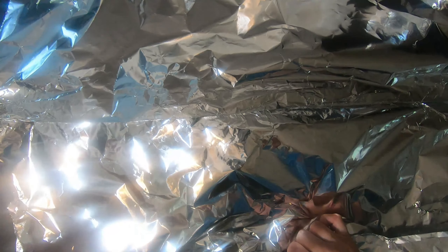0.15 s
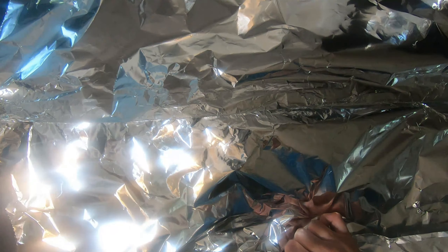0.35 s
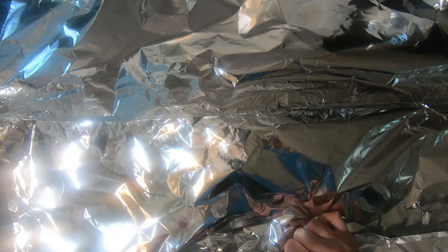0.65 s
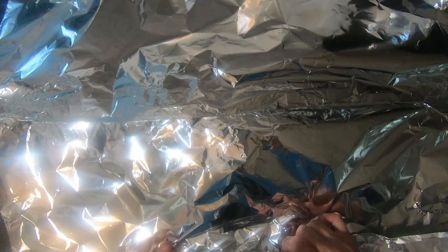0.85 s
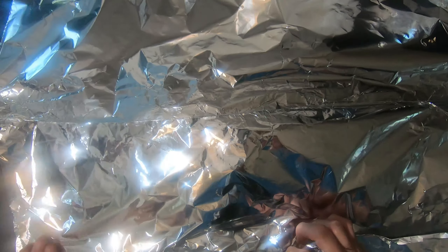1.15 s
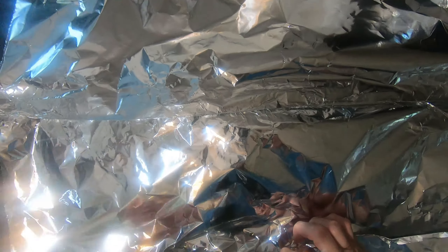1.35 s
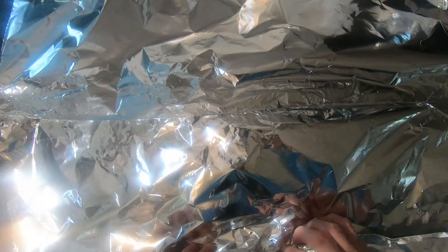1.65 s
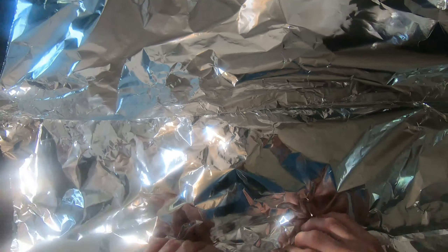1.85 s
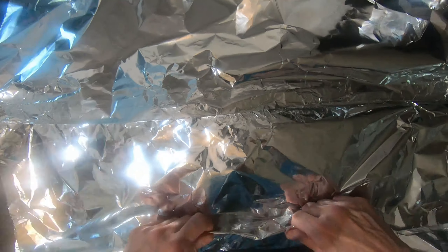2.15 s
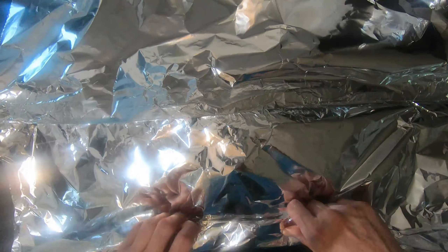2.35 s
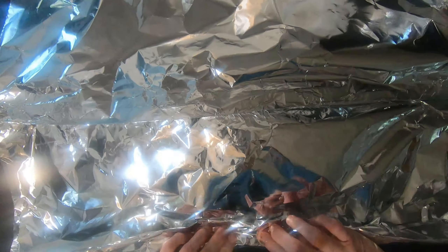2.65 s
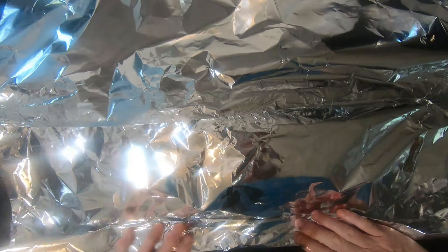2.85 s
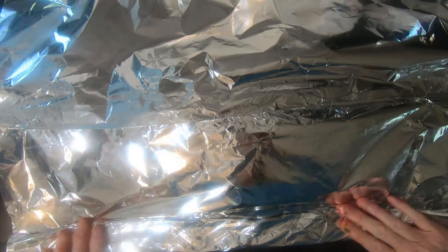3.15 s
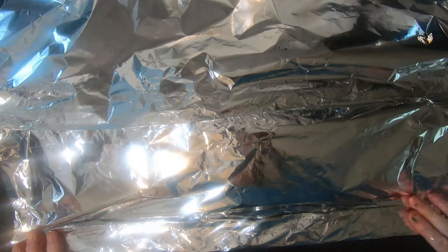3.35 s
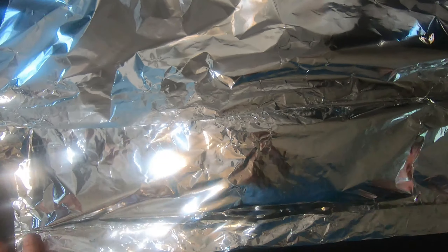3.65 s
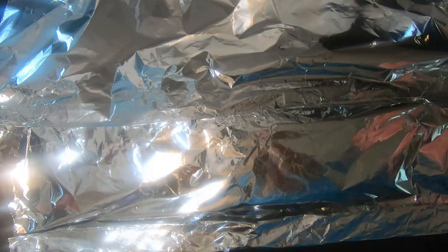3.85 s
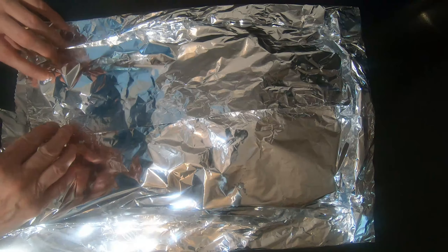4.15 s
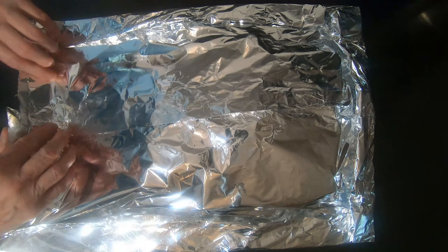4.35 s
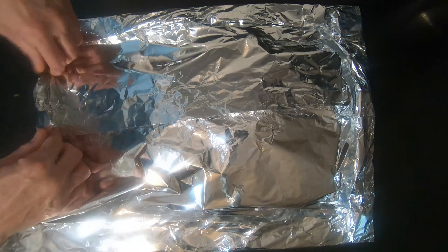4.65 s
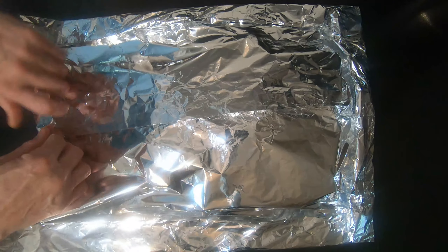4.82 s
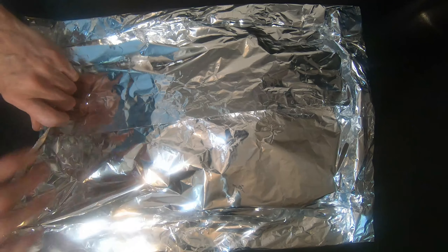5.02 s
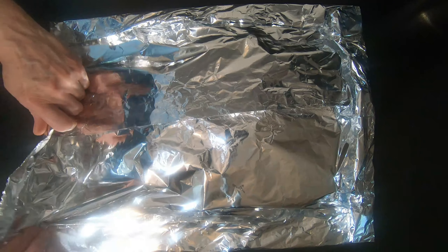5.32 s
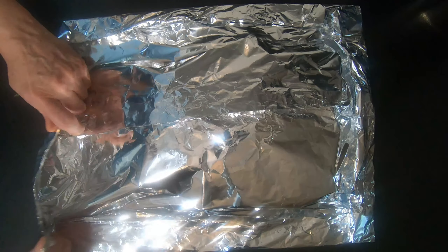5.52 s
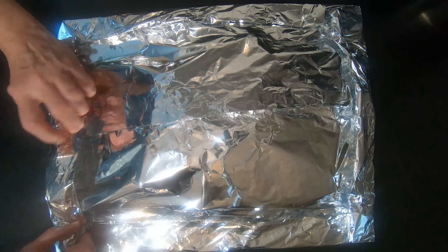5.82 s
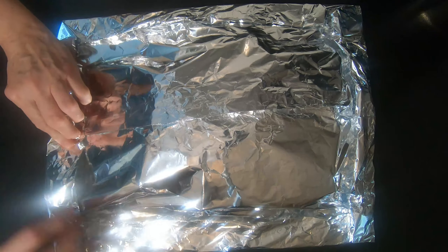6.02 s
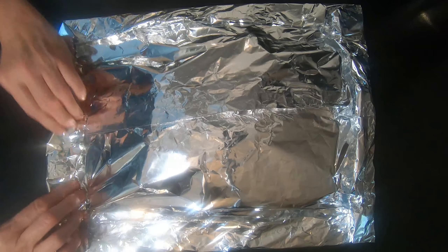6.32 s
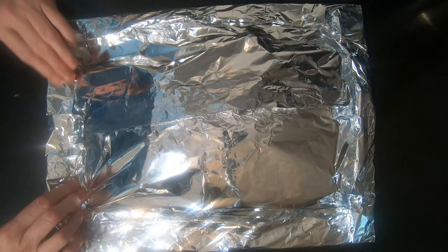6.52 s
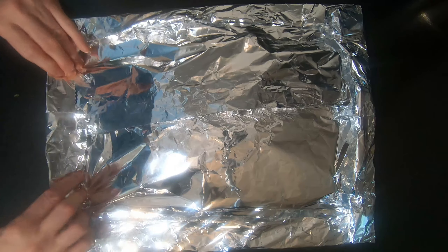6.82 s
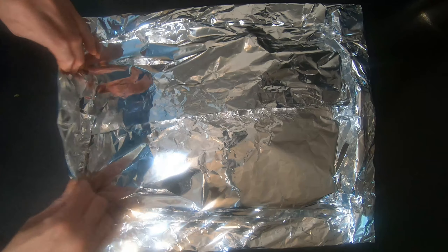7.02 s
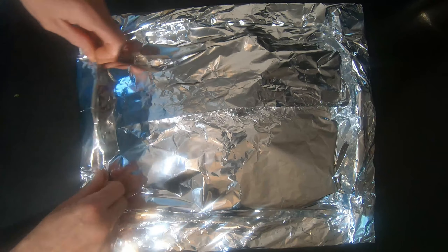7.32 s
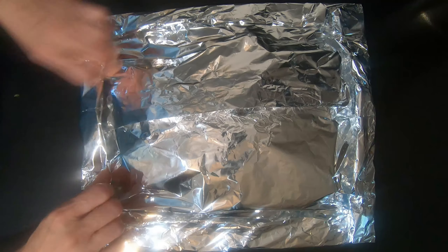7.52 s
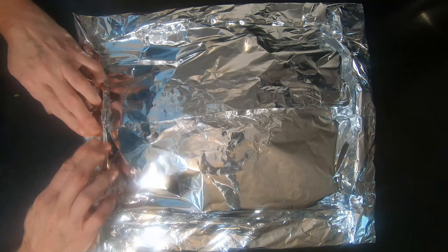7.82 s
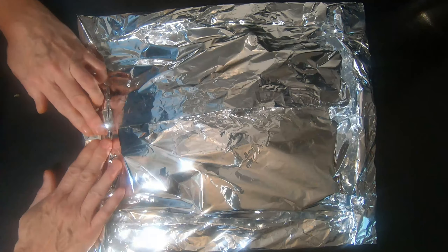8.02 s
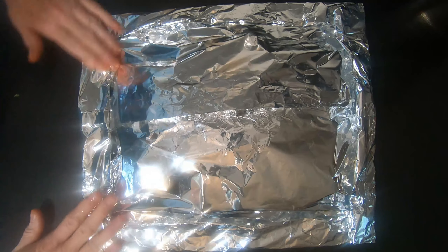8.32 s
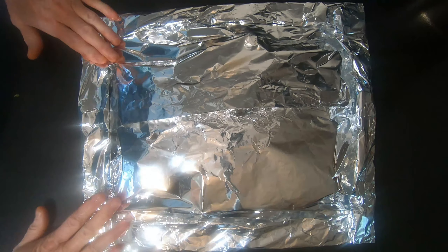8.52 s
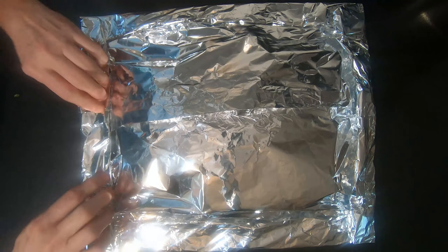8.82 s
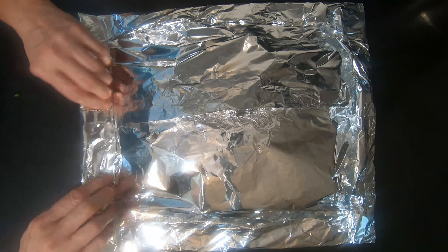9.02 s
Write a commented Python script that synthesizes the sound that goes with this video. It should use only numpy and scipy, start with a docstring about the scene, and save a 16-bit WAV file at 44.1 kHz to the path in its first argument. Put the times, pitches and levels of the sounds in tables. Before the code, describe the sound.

Aluminium foil crinkles and crackles brightly in close hand-made bursts, with sharp snaps, small pops and soft tray bumps over a faint kitchen hum.

```python
"""Two hands fold and crimp aluminium foil round a tray of food, first along its side, then at its end.
From the start an appliance hums in the small kitchen and the working fingers shake the tray.
Creases buckle in avalanches of tiny clicks, each a burst of noise that rings briefly in the sheet.
Big creases soon snap in clusters of such bursts, and hands bump the tray: noise rings its low modes.
Then wide facets pop, and later the taut cover pings: dying tones, each started by a dull crack."""
import sys
import numpy as np
from scipy import signal
from scipy.fft import rfft, irfft, next_fast_len
from scipy.io import wavfile
from scipy.ndimage import uniform_filter1d

SR = 44100
rng = np.random.default_rng(int(sys.argv[2]) if len(sys.argv) > 2 else 0)


def wav_out(sig):
    """Save sig, one row per channel (or a flat mono array), as 16-bit PCM at SR to the path in sys.argv[1]."""
    wavfile.write(sys.argv[1], SR, np.round(np.clip(np.atleast_2d(sig).T, -1, 1) * 32767).astype(np.int16))


N = 404397
TIME = np.arange(N) / SR
RING_SIZE = 8192  # samples in one crease, pop or bump
RING_TIME = np.arange(RING_SIZE) / SR
RING_HZ = np.fft.rfftfreq(RING_SIZE, 1 / SR) + 1  # the 1 keeps the logarithm finite

# Big creases giving way. Each row: time in seconds, peak level in dB before a trim shared by all.
BIG_CREASES = [(0.112, -14.5), (0.185, -16), (0.431, -13), (0.54, -17.5), (0.737, -35.5), (0.758, -37),
               (1.305, -20), (1.563, -14), (1.897, -12), (1.964, -15), (2.548, -18), (2.662, -18.5),
               (2.795, -10), (3.227, -14.5), (3.942, -19.5), (4.04, -17), (4.206, -25), (4.327, -21),
               (4.523, -19), (4.65, -12), (4.831, -13.5), (4.959, -18), (5.164, -17.5), (5.204, -23.5),
               (5.253, -23.5), (5.298, -22), (5.6, -17), (5.64, -14), (5.8, -15.5), (6.259, -15.5),
               (6.764, -22), (7.049, -17.5), (7.197, -13.5), (7.647, -15.5), (7.717, -22), (8.123, -13),
               (8.173, -19), (8.398, -17), (8.429, -14), (8.525, -16.5), (8.566, -13.5), (8.671, -16),
               (8.692, -11.5), (8.885, -22.5), (8.941, -14), (8.972, -19), (9.022, -16)]


def from_db(db):
    """Turn decibels into a gain."""
    return 10 ** (np.asarray(db) / 20)


def rms_one(x):
    """Scale a sound to an average (rms) strength of 1."""
    return x / np.sqrt(np.mean(x ** 2) + 1e-20)


def in_time(rows):
    """Draw each column of a table as a curve over time, with straight lines between rows."""
    seconds, *columns = np.transpose(rows)
    return [np.interp(TIME, seconds, column) for column in columns]


def at_hz(points, hz):
    """Read a curve of (Hz, dB) points on a log-frequency axis."""
    point_hz, point_db = np.transpose(points)
    return np.interp(np.log(hz), np.log(point_hz), point_db)


def drift(per_s):
    """A random wander of rms 1, with this many fresh values per second."""
    values = rng.standard_normal(N // 20)
    return rms_one(np.interp(TIME * per_s, np.arange(N // 20), values))


def add(out, seconds, sound):
    """Mix a sound into the output at a given time."""
    at = max(round(seconds * SR), 0)
    out[..., at:at + sound.shape[-1]] += sound[..., :N - at]


def kitchen(rumble_db=-50, side_db=-9.0, waver_rad=1.0):
    """Room rumble is noise coloured by a curve; an appliance hums as steady tones of wandering phase."""
    # Colour of the rumble. Each row: pitch in Hz, relative level in dB per Hz.
    rumble_colour = [(25, -24), (62, -9), (95, -15), (150, 1.5), (290, -11), (500, -6), (900, -20),
                     (5000, -18), (14000, -44)]
    # Hum of the appliance. Each row: pitch in Hz, rms level in dB before the final balance.
    hum_tones = [(76, -63.5), (151.5, -60.5)]
    size = next_fast_len(N + RING_SIZE, True)
    hz_axis = np.fft.rfftfreq(size, 1 / SR) + 1
    noise = rfft(rng.standard_normal((2, size)))
    mid, side = irfft(noise * from_db(at_hz(rumble_colour, hz_axis)))[:, :N]
    out = from_db(rumble_db) * rms_one(mid + from_db(side_db) * side * [[1], [-1]])
    for hz, db in hum_tones:
        phase = 2 * np.pi * hz * TIME + waver_rad * drift(8.3)
        out = out + from_db(db) * np.sqrt(2) * np.sin(phase)
    return out


def crushing(attack_s=0.023, release_db_per_s=201.5, fold_s=.019):
    """Crushing strength in dB: foil yields fast, holds, then settles; collapsing folds add flurries."""
    # Presses of the fingers. Each row: start in seconds, length in seconds,
    # relative crackle level in dB at the start, and the same at the end.
    presses = [(-0.02, 0.348, -29, -25), (0.343, 0.24, -32, -28), (0.775, 0.16, -23, -24.5),
               (0.951, 0.29, -25, -25.5), (1.281, 0.26, -28, -35), (1.555, 0.71, -29, -23),
               (2.284, 0.26, -26.5, -26), (2.57, 0.11, -33.5, -26), (2.665, 0.38, -23, -22),
               (3.045, .43, -24.5, -24), (3.488, 0.36, -29.5, -31), (3.94, .16, -26, -30.5),
               (4.112, 0.34, -34.5, -37), (4.321, 0.54, -29.5, -28.5), (4.923, 0.14, -32, -28),
               (5.1, 0.22, -38, -34.5), (5.302, .27, -25.5, -24.5), (5.603, 0.54, -28, -28.5),
               (6.16, .08, -39, -32), (6.254, 0.17, -27.5, -29.5), (6.42, 0.27, -37, -30),
               (6.731, 0.425, -29.5, -28), (7.155, 0.32, -26.5, -24.5), (7.478, 0.2, -27, -32),
               (7.708, .09, -32, -23.5), (7.807, .24, -27, -24.5), (8.076, 0.18, -30.5, -34.5),
               (8.198, .245, -27.5, -23), (8.458, 0.26, -31, -37.5), (8.676, 0.15, -28, -35.5),
               (8.879, 0.05, -28, -32), (8.936, 0.21, -28.5, -25.5)]
    # Folds collapsing. Each row: time of the peak in seconds, relative crackle level in dB.
    folds = [(0.437, -26), (0.915, -23), (2.47, -24), (3.245, -23), (3.673, -27.5), (3.979, -27.5),
             (4.405, -27), (5.039, -29.5), (5.534, -25), (5.859, -24.5), (6.276, -25), (6.348, -24.5),
             (6.972, -26), (7.449, -25.5), (7.805, -24.5), (7.978, -23)]
    power = np.zeros(N)
    for start, length, start_db, end_db in presses:
        held_db = np.interp(TIME, [start, start + length], [start_db, end_db])
        settled_db = np.clip(release_db_per_s * (TIME - start - length), 0, 100)
        rise = np.clip((TIME - start) / attack_s, 0, 1)
        power += (rise * from_db(held_db - settled_db)) ** 2
    for peak_s, db in folds:
        near = np.abs(TIME - peak_s) < 10 * fold_s
        power[near] += from_db(db) ** 2 * np.exp(-((TIME[near] - peak_s) / fold_s) ** 2)
    return 10 * np.log10(power + 1e-7)


def sticking(stick_db=2.5, stick_s=.016):
    """Foil holds still just before a big crease gives way: how far the crackle dips, in dB."""
    dip_db = np.zeros(N)
    for s, _ in BIG_CREASES:
        near = np.abs(TIME - s) < 10 * stick_s
        # the dip is deepest half of stick_s ahead of the snap
        dip_db[near] += stick_db * np.exp(-((TIME[near] - s) / stick_s + .5) ** 2)
    return dip_db


def avalanches(per_s=60, fade_s=0.0025, surge=0.76):
    """One crease tips its neighbours: the strength of the clicks leaps up and dies away."""
    starts = (rng.random(N) < per_s / SR) * rng.exponential(1, N)
    surges = signal.lfilter([1], [1, -np.exp(-1 / (fade_s * SR))], starts + 1e-18)
    return np.sqrt(1 + surge * surges)


def sheet_colour(s, span_width_hz=950):
    """The sheet's spectrum at a moment: moving and fixed resonances, with the deep bass taken away."""
    # What a click sounds like in the sheet. Each row: pitch in Hz, relative level in dB per Hz.
    sheet_curve = [(250, -18), (370, -22.5), (480, -13), (900, -7.5), (1500, -4.5), (3000, -2), (5000, -3),
                   (7700, -6.5), (10300, -13.5), (11500, -22), (14000, -30), (15700, -43)]
    # Fixed resonances shared by every click. Each row: pitch in Hz, width in Hz, gain in dB.
    fixed_peaks = [(453, 83, 4.5), (1065, 17, 3.5), (1640, 100, 4)]
    # Main resonance of the free span of foil, which shifts with the grip.
    # Each row: time in seconds, pitch in Hz, gain in dB.
    free_span = [(.85, 2550, 2), (1.35, 3120, 3.5), (2.3, 2570, 2.5), (4.2, 3180, 3), (5.4, 3450, 3),
                 (6.6, 3240, 3), (7.4, 3100, 2), (8.3, 3020, 4)]
    times, pitches, gains_db = np.transpose(free_span)
    span = (np.interp(s, times, pitches), span_width_hz, np.interp(s, times, gains_db))
    colour_db = at_hz(sheet_curve, RING_HZ)
    for hz, width, gain_db in [*fixed_peaks, span]:
        colour_db = colour_db + gain_db / (1 + (2 * (RING_HZ - hz) / width) ** 2)
    return from_db(colour_db) / np.sqrt(1 + (170 / RING_HZ) ** 6)


def buckle(s, uneven_db, crack_db, crack_t60=0.0037, sheet_t60=0.062, room_t60=0.3, room_db=-9, pan_db=1.0):
    """One crease in stereo, energy 1: a crack, bending waves dying in the sheet, then the room."""
    # Spread of the sound between the ears. Each row: pitch in Hz, side minus mid in dB.
    ear_spread = [(300, -25), (700, -5.5), (1400, -5), (2600, -9.5), (5000, -8), (8000, 0)]
    # The sheet radiates unevenly to the two sides. Each row: pitch in Hz, left minus right in dB.
    sheet_lean = [(350, -5.5), (700, -4), (1300, 3), (2800, 0.4), (5000, -2)]
    # each stage: strength in dB, seconds to fade by 60 dB
    stages = [(crack_db, crack_t60), (0, sheet_t60), (room_db, room_t60)]
    fade = np.sqrt(sum(from_db(db - 60 * RING_TIME / t60) ** 2 / t60 for db, t60 in stages))
    mid, side = rfft(rng.standard_normal((2, RING_SIZE)) * fade)
    # every facet has broad resonances of its own
    own_log_hz = np.linspace(np.log(300), np.log(SR / 2), 24)
    own_db = uneven_db * np.interp(np.log(RING_HZ), own_log_hz, rng.standard_normal(24))
    # minimum phase: nothing rings before the crack
    cepstrum = irfft(np.log(sheet_colour(s) * from_db(own_db) + 1e-4))
    keep = (RING_TIME > 0) * (RING_TIME < RING_TIME[-1] / 2)
    colour = np.exp(rfft(2 * cepstrum * keep))
    ears = mid + side * from_db(at_hz(ear_spread, RING_HZ)) * [[1], [-1]]
    lean_db = at_hz(sheet_lean, RING_HZ) + pan_db * rng.normal()
    sound = irfft(ears * colour * from_db(lean_db * np.array([[.5], [-.5]])))
    return sound / np.sqrt(np.sum(sound.mean(0) ** 2))


def ticks(crush_db, per_s=30, over_db=11.5, spread_db=8.0, low_hz=2000, high_hz=8500):
    """Now and then a tiny crease facing the microphone gives a dry, sharp tick, uneven between the ears."""
    level_db = crush_db + over_db + rng.uniform(-spread_db, spread_db, (2, N))
    clicks = (rng.random(N) < per_s / SR) * from_db(level_db)
    band = signal.butter(2, [low_hz, high_hz], "band", fs=SR, output="sos")
    return signal.sosfilt(band, clicks + 1e-18)


def crackle(per_s=1000, rate_per_db=0.0842, size_db=2.5, level_db=0.3, even_s=0.041, facets_per_s=24, count=6):
    """Creases buckle all over the sheet; harder crushing makes them both louder and more frequent."""
    crush_db = crushing() - sticking()
    rate = per_s * np.exp(2 * rate_per_db * (crush_db - np.median(crush_db)))
    sizes = from_db(size_db * np.minimum(rng.exponential(1, N), 4.5)) * avalanches()
    clicks = (rng.random(N) < rate / SR) * sizes * rng.choice([-1, 1], N)
    # the fingers feed in energy steadily, and the creases share it out
    power = uniform_filter1d(clicks ** 2, int(even_s * SR))
    power = uniform_filter1d(power, int(even_s * SR / 2))
    clicks = clicks / np.sqrt(np.abs(power) + 1e-3) * from_db(crush_db + level_db)
    # a few facets are in play at once; fresh ones take over from old ones, one by one
    facet = (TIME * facets_per_s + count * rng.random(N)).astype(int)
    out = np.zeros((2, N))
    for k in range(facet.max()):
        first, last = np.searchsorted(TIME, [(k - count) / facets_per_s, (k + 1) / facets_per_s])
        own = clicks[first:last] * (facet[first:last] == k)
        ring = buckle(first / SR, uneven_db=2.5, crack_db=-10.0)
        add(out, first / SR, signal.fftconvolve(own[None], ring, axes=1))
    return out + ticks(crush_db)


def facet_size(x, wide_db=8.0, tiny_db=5.5, wide_hz=1700, tiny_hz=5500):
    """Loose wide facets darken the crackle, tight little ones brighten it."""
    # Size of the facets being worked. Each row: time in seconds, wide against middling ones in dB,
    # tiny against middling ones in dB; wide_db and tiny_db are added to these.
    facet_mix = [(.15, -6.5, -6), (.85, -11.5, -8.5), (1.15, -13, -2.5), (1.9, -8.5, -3.5), (2.5, -9, -8),
                 (3.7, -14, -5.5), (4, -11, -6), (4.22, -13.5, -8), (4.55, -5, -2.5), (5.4, -9, -6.5),
                 (5.9, -5, -6.5), (6.55, -11, -5), (7.35, -7, -6.5), (8.3, -8.5, -7), (8.65, -9.5, -6),
                 (9.05, -9.5, -7.5)]
    wide, tiny = in_time(facet_mix)
    low = signal.sosfiltfilt(signal.butter(2, wide_hz, fs=SR, output="sos"), x)
    high = signal.sosfiltfilt(signal.butter(2, tiny_hz, "high", fs=SR, output="sos"), x)
    middle = x - low - high
    return middle + low * from_db(wide + wide_db) + high * from_db(tiny + tiny_db)


def tray(bump_db=-2.5, push_s=0.02, shake_db=-50.0, follows=0.36, uneven_db=2.0):
    """Soft pushes and the steady work of the fingers shake the tray's low modes."""
    # Dull modes of the tray on the counter. Each row: pitch in Hz, relative gain in dB,
    # ring length in seconds (the fade by 60 dB takes about a fifth longer).
    tray_modes = [(71.6, -7.5, 0.18), (126, -1.5, 0.36), (150.2, -0.5, 0.088), (197.5, -5, 0.28)]
    # Hands bumping the tray. Each row: time in seconds, peak level in dB before bump_db is added.
    bumps = [(0.19, -30), (0.829, -35), (1.191, -35), (2.247, -32), (3.36, -33), (4.51, -33), (6.76, -38),
             (6.93, -30.5), (7.391, -32), (7.975, -32), (8.402, -33.5)]

    def body(force):
        """Ring every mode with the same force."""
        return sum(from_db(db) * signal.lfilter(*signal.iirpeak(hz, hz * ring_s / 1.83, fs=SR), force)
                   for hz, db, ring_s in tray_modes)

    crush_db = crushing()
    level_db = shake_db + follows * (crush_db - np.median(crush_db)) + uneven_db * drift(12)
    out = rms_one(body(rng.standard_normal(N))) * from_db(level_db)
    for s, peak_db in bumps:
        push = rng.standard_normal(RING_SIZE) * RING_TIME * np.exp(-RING_TIME / push_s)
        thud = body(push)
        add(out, s, thud / np.abs(thud).max() * from_db(peak_db + bump_db))
    return out


def snaps(level_db=1.0, chain_s=.005, neighbour_db=-8, count=3):
    """A big crease gives way in a quick cluster: smaller ones go just before it and just after."""
    out = np.zeros((2, N))
    for s, peak_db in BIG_CREASES:
        sound = buckle(s, uneven_db=1.0, crack_db=-6.0, sheet_t60=0.075)
        sound = sound / np.abs(sound.mean(0)).max() * from_db(peak_db + level_db)
        add(out, s + chain_s / 2, sound)
        for delay in (np.arange(count) + rng.random(count)) / count:
            neighbour = sound * from_db(neighbour_db) * rng.choice([-1, 1])
            add(out, s + chain_s * (2 * delay - .5), neighbour)
    return out


def flip(s, hz, t60, crack_db, rise_s=0.00034):
    """A dying tone with the dull crack that starts it; crack_db sets the crack's peak."""
    fade = from_db(-60 * RING_TIME / t60)
    rise = -np.expm1(-RING_TIME / rise_s)
    tone = np.sin(2 * np.pi * hz * RING_TIME) * fade * rise
    crack = signal.lfilter(*signal.iirpeak(hz, 1, fs=SR), buckle(s, uneven_db=1.5, crack_db=-3.0))
    return tone + crack / np.abs(crack).max() * from_db(crack_db)


def pops(level_db=-1.5, cycles=28.0, crack_db=4.5):
    """A wide facet flips with a short knock at its own pitch, fading by 60 dB in a set number of cycles."""
    # Wide facets flipping over. Each row: time in seconds, level in dB before level_db is added, pitch in Hz.
    facet_flips = [(1.219, -24, 1920), (2.746, -24.5, 800), (4.521, -24.5, 775), (4.564, -27, 1076),
                   (4.882, -24, 1460), (5.102, -27, 780), (5.631, -17, 1290), (5.953, -18, 1280),
                   (7.097, -22, 1280), (7.397, -15, 1205), (7.533, -22.5, 861), (8.209, -24, 2120)]
    out = np.zeros((2, N))
    for s, peak_db, hz in facet_flips:
        add(out, s, flip(s, hz, cycles / hz, crack_db) * from_db(peak_db + level_db))
    return out


def pings(level_db=2.0, crack_db=7.5, centre_hz=1630, t60=0.049, spread=0.023):
    """A jerk sets the taut cover ringing; each ping's pitch is drawn at random close to a shared centre."""
    # Pings of the cover. Each row: time in seconds, level in dB before level_db is added.
    cover_pings = [(5.52, -23.5), (5.8, -26), (6.259, -24), (6.351, -29), (7.376, -26), (8.185, -24),
                   (8.895, -30.5), (8.987, -21.5), (9.111, -24)]
    out = np.zeros((2, N))
    for s, peak_db in cover_pings:
        hz = centre_hz * rng.normal(1, spread)
        add(out, s, flip(s, hz, t60, crack_db) * from_db(peak_db + level_db))
    return out


def placed(foil, top_hz=9000):
    """Slow changes of left-right balance and top treble over time."""
    # Balance and treble of the foil. Each row: time in seconds, left minus right in dB,
    # gain of the top treble in dB.
    balance_and_top = [(.5, 0.7, 5), (1.4, 0.1, 1), (3.65, -0.5, 7), (4, 1.5, 2)]
    balance_db, top_db = in_time(balance_and_top)
    top = signal.sosfiltfilt(signal.butter(2, top_hz, "high", fs=SR, output="sos"), foil)
    return (foil + top * (from_db(top_db) - 1)) * from_db(balance_db * np.array([[.5], [-.5]]))


def scene():
    """Foil with its changing balance, over the tray and the room, which lean slightly right."""
    foil = placed(facet_size(crackle()) + snaps() + pops() + pings())
    return foil + (tray() + kitchen()) * from_db([[-.6], [.6]])


def record(dry, cutoff_hz=15800):
    """The top is cut steeply."""
    return signal.sosfilt(signal.ellip(12, .1, 90, cutoff_hz, fs=SR, output="sos"), dry)


dry = scene()
out = record(dry)
wav_out(out)
```